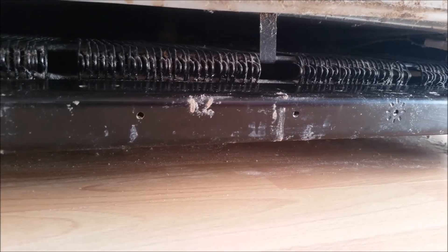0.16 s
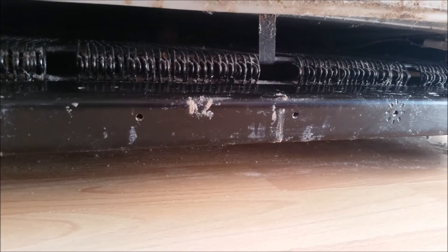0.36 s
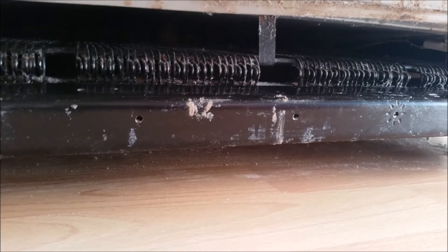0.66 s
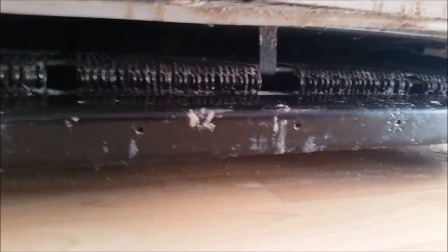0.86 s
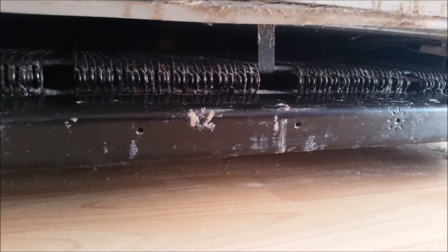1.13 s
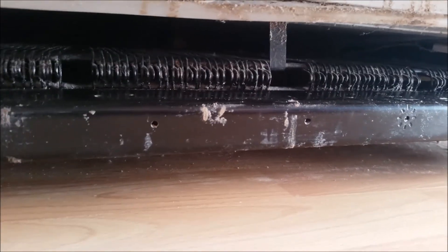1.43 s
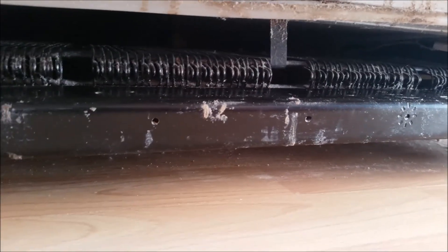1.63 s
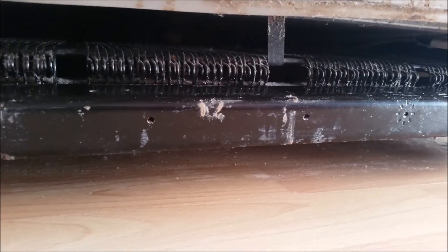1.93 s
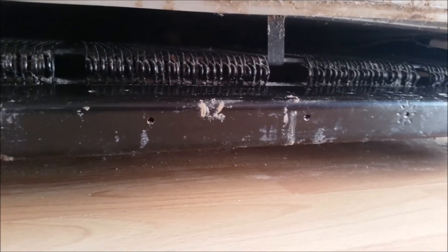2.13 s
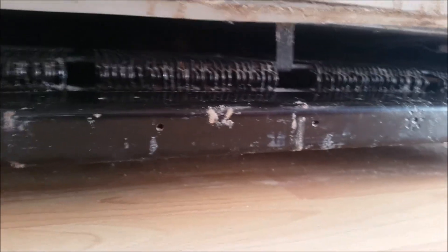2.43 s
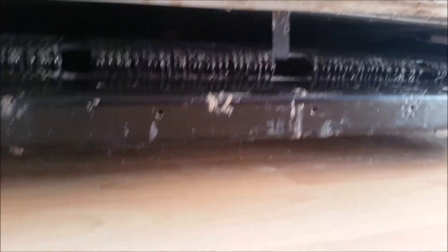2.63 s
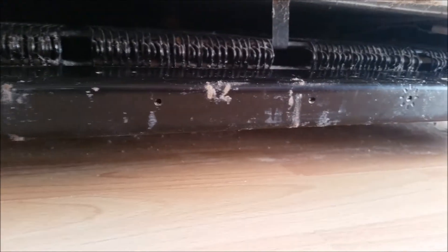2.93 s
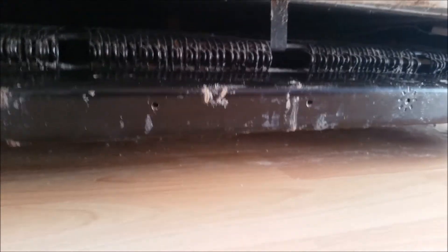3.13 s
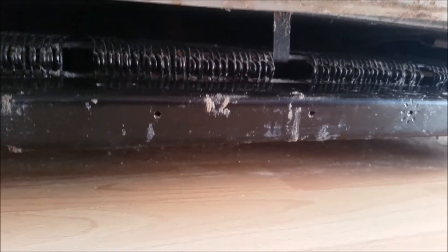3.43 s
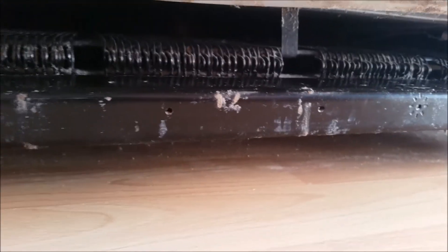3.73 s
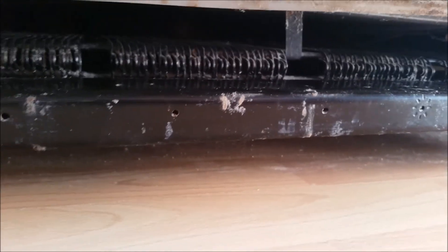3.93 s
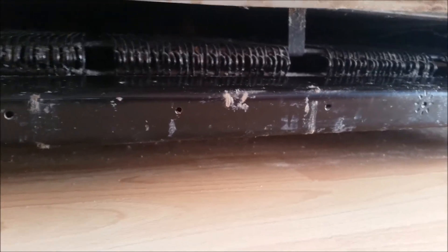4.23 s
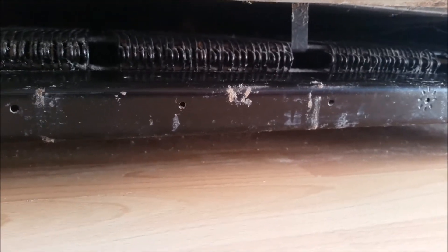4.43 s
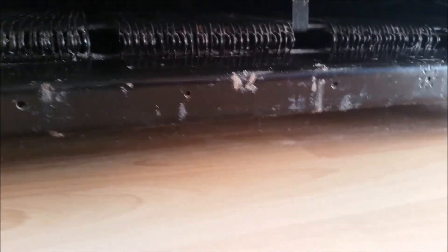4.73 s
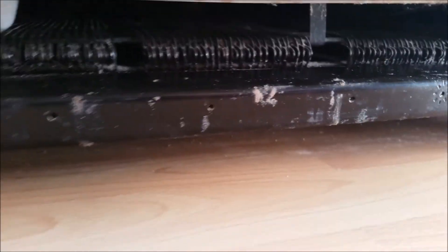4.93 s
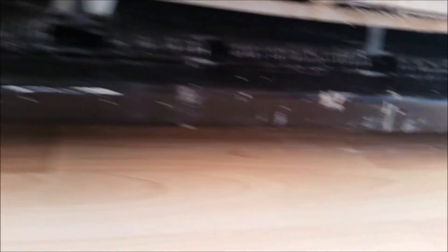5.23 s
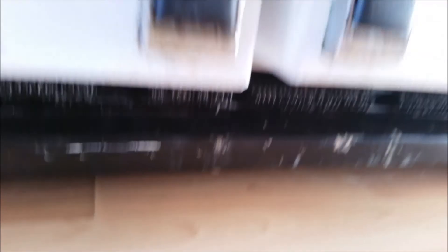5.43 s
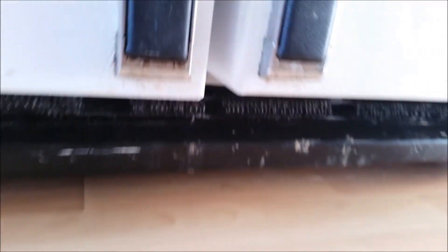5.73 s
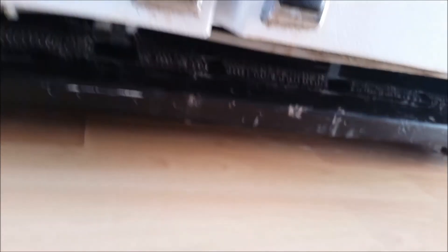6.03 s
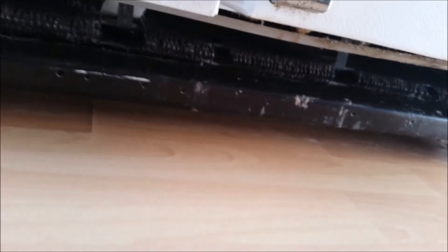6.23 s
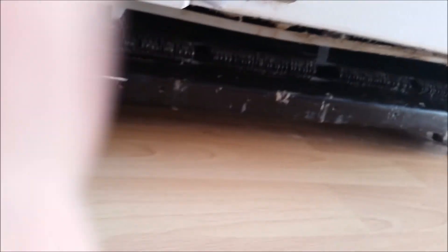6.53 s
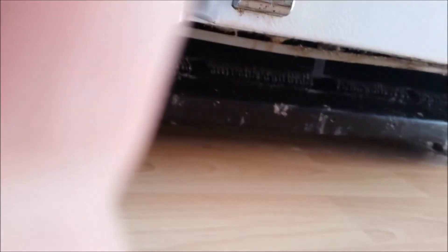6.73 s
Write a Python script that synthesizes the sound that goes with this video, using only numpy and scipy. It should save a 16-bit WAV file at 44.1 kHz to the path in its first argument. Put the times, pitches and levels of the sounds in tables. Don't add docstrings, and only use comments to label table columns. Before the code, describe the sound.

Deep throbbing fridge hum and soft airflow continue throughout, broken by sharp case snaps near one and two and a half seconds and late fumbling.

```python
import sys
import numpy as np
from scipy import signal
from scipy.fft import rfft, irfft
from scipy.io import wavfile
from scipy.ndimage import uniform_filter1d

SR = 44100
rng = np.random.default_rng(int(sys.argv[2]) if len(sys.argv) > 2 else 0)


def to_linear_factor(level_db):
    exponent = np.asarray(level_db, float) / 20
    return 10 ** exponent


def output_pcm(signal):
    pcm = np.clip(np.atleast_2d(signal).T, -1, 1) * 32767
    wavfile.write(sys.argv[1], SR, np.round(pcm).astype(np.int16))


N = 302967
T = np.arange(N) / SR

# order, left_db, right_db, left_lead_rad
COMPRESSOR_TONES = [(1, -44, -45.5, -.15), (2, -57.5, -59.5, .39), (4, -60, -52, 0.69),
                    (5, -50.5, -56, 0.76), (6, -56.5, -62.5, -0.64)]
FAN_TONES = [(1, -61, -56.5, .4), (2, -38, -38.5, 0.29), (4, -45.5, -47, 0.42), (5, -60, -59.5, 0.6),
             (6, -58, -66, 0.97)]
MAINS_TONES = [(2, -31, -31.5, 0.21), (4, -61.5, -58, .24)]
# pitch_hz, left_db, right_db, left_lead_rad
PANEL_TONES = [(93.62, -48.5, -48.5, .35), (146.3, -54, -56, .22), (289.7, -57, -59, .29)]
# freq_hz, level_db_per_hz
RUMBLE_SPECTRUM = [(25, -76.5), (45, -75.5), (80, -66), (135, -61.5), (160, -60.5), (185, -66.5),
                   (215, -62), (235, -63.5), (260, -71.5), (330, -73.5), (500, -82.5), (1500, -150)]
# freq_hz, level_db_per_hz
GRIP_SPECTRUM = [(20, -74.5), (45, -73), (80, -71), (150, -65), (300, -75.5), (500, -99), (1200, -150)]
# freq_hz, width_hz, level_db
CABINET_MODES = [(174.7, 17, -44), (187.2, 20, -47)]
# time_s, pitch_hz, level_db
BOOM_SWELLS = [(0.14, 175.9, -38), (0.3, 184.5, -31.0), (0.409, 184.8, -31.0), (0.53, 182.8, -39),
               (0.6, 180.8, -35.5), (0.74, 183.8, -31.5), (0.88, 180.6, -36), (1.05, 179.6, -34.5),
               (1.13, 186.2, -36.5), (1.19, 185.4, -35), (1.29, 187.4, -34), (1.41, 178.6, -33.5),
               (1.49, 184.0, -32.5), (1.56, 184.5, -33), (1.71, 184.0, -29.5), (1.8, 183.8, -35),
               (1.93, 181.4, -31.0), (2.07, 184.4, -36.0), (2.16, 186.0, -30.0), (2.27, 183.0, -34),
               (2.4, 182.2, -34.5), (2.59, 182.0, -33.5), (2.66, 183, -36.5), (2.75, 181, -28.5),
               (2.92, 181.1, -32.0), (3.03, 177.6, -37), (3.13, 188.0, -33), (3.201, 183.8, -30.0),
               (3.34, 184.3, -31), (3.4, 182.3, -29.5), (3.47, 188.7, -31), (3.55, 186.1, -29.5),
               (3.66, 180.0, -30.5), (3.78, 180.0, -30.5), (3.85, 183.7, -28.5), (3.94, 182.7, -31.5),
               (4.08, 184.0, -42.5), (4.14, 174, -41.5), (4.22, 174.2, -35), (4.29, 181.8, -33.5),
               (4.39, 183.9, -31.5), (4.451, 184.6, -31), (4.65, 186.0, -36), (4.73, 186.3, -36.5),
               (4.81, 180.1, -41), (4.9, 188.9, -34.5), (5.02, 184.5, -29), (5.1, 179.4, -36),
               (5.26, 187.4, -29), (5.33, 182.0, -31), (5.5, 182.1, -40), (5.6, 173.2, -31),
               (5.86, 185.2, -30.5), (5.95, 184.0, -28.5), (6.09, 184.0, -32.5), (6.211, 183.0, -37),
               (6.33, 181.0, -32), (6.47, 180.0, -35.5)]
# freq_hz, level_db_per_hz
AIR_LEFT_SPECTRUM = [(300, -78.5), (450, -72.5), (800, -77), (1150, -75.5), (1500, -89), (2050, -75.5),
                     (2400, -80.5), (2740, -100), (3000, -77), (3700, -77.5), (4250, -84), (5200, -107),
                     (6500, -121.1), (8500, -140.0)]
AIR_RIGHT_SPECTRUM = [(300, -86.5), (450, -78.5), (750, -76), (980, -86.5), (1350, -85), (1550, -86),
                      (1750, -99), (2200, -89.5), (2750, -100), (3400, -91.5), (4200, -93), (5000, -107.4),
                      (6500, -119.4), (8500, -140.0)]
# freq_hz, width_hz, level_db
CAVITY_MODE = (1310, 520, -54)
# freq_hz, level_db_per_hz
RUSTLE_TOP_SPECTRUM = [(7000, -135), (8800, -140), (10000, -121), (11500, -104), (13000, -101),
                       (14800, -102), (15700, -104), (16100, -160)]
RUSTLE_LOW_SPECTRUM = [(4200, -106), (5000, -111), (6200, -115), (7000, -126), (8000, -150)]
# time_s, rise_s, fall_s, level_db, left_minus_right_db
SLIDES = [(.02, .05, 0.15, -44.5, 4.5), (.89, .008, .012, -42, -11), (.97, .06, 0.13, -42, 7.5),
          (1.541, .002, .002, -40, -14), (2.1, 0.074, .02, -51, 4), (2.3, .2, .1, -54.5, 1.5),
          (2.72, 0.018, .03, -49, -5), (3.487, 0.0039, 0.017, -47, -9), (3.535, .003, .015, -55, -4),
          (3.622, 0.0034, .005, -45.5, -6), (3.66, 0.014, .016, -43.5, -9), (3.915, 0.01, 0.03, -34, -7),
          (4.02, .06, .05, -41, 6), (4.12, .05, .03, -39, 6), (4.647, .004, .006, -32, -10),
          (4.69, 0.035, 0.067, -27.5, -3), (4.745, .02, .012, -35, -13), (4.83, 0.037, .025, -36.5, 1),
          (5.04, 0.033, 0.031, -35, 0.5), (5.1, .02, .03, -37, 5), (5.44, 0.043, .04, -36, -2.5),
          (5.6, .015, .015, -41, -8), (5.82, 0.16, 0.29, -23, -1), (6.15, 0.037, .012, -26.5, 2)]
# time_s, rise_s, fall_s, level_db
CREEPS = [(.72, 0.075, 0.054, -19.5), (1, 0.062, 0.039, -12), (2.4, 0.06, 0.11, -10.5),
          (2.78, 0.2, 0.11, -13.5), (3.35, 0.072, 0.078, -13), (3.67, 0.031, 0.1, -6),
          (3.92, 0.13, 0.12, -8), (4.65, 0.021, 0.065, -14), (4.78, 0.12, 0.013, -7.5),
          (5.15, 0.045, 0.045, -16), (5.78, 0.047, .05, -23.5)]
# time_s, rise_s, fall_s, level_db
JOLTS = [(.86, 0.03, 0.039, -33), (3.54, 0.02, 0.034, -36), (3.65, 0.034, 0.034, -34.5),
         (4.67, 0.047, 0.044, -34), (4.83, 0.018, 0.033, -31), (4.95, 0.017, 0.037, -35.5),
         (5.03, 0.029, 0.029, -41), (5.155, 0.031, 0.018, -32.5), (6.3, 0.031, 0.028, -42),
         (6.66, 0.022, 0.026, -48), (6.8, 0.027, 0.035, -40)]
# time_s, peak_db, push_ms, sign
TAPS_LEFT = [(.982, -14, 0.28, -0.84), (.909, -24, 0.23, 0.51), (.938, -28, .2, -0.75),
             (.953, -31, 0.18, 0.47), (1.352, -18.5, 0.68, 0.97), (1.5301, -21.5, 0.52, -0.55),
             (1.94, -15.5, 1, 0.88), (2.322, -20.5, 0.13, 0.56), (2.394, -12.5, 0.94, -1.33),
             (2.3945, -23, 0.13, -1.05), (2.4458, -16.5, .3, -0.86), (2.66, -19.5, 0.097, 0.54),
             (2.748, -9.5, 0.84, 0.81), (3.608, -16, 0.16, -0.85), (3.655, -19, 0.14, -0.76),
             (3.783, -21.5, 0.19, -1.2), (3.799, -16.5, 0.58, -1.46), (3.811, -27, 0.29, 0.32),
             (3.916, -19, 0.6, 1), (4.016, -16, 0.74, 0.96), (4.3, -20.5, 0.68, 1),
             (4.6485, -16.5, 0.43, -0.77), (4.72, -23, 0.4, 1), (4.758, -22.5, 0.22, -0.87),
             (4.767, -26, 0.22, 0.41), (6.516, -14.5, 0.11, 1), (6.67, -0.5, 0.25, -0.5)]
TAPS_RIGHT = [(1.0303, -12, 0.89, -0.87), (1.035, -19, 3.4, -0.57), (1.5294, -27, .6, -1.2),
              (2.4595, -8.5, 0.71, 0.62), (2.4686, 7, 1.78, 0.64), (2.4718, -2.5, 5.2, -1.16),
              (2.5042, 10, 0.43, -0.23), (2.581, -20.5, 1, -1.4), (2.591, -15, 1.16, -1.26),
              (2.6595, -2.5, 0.4, 0.79), (3.54, -28.5, 1.5, 0.6), (3.64, -23, 1.3, 0.72),
              (4.674, -15, 1.5, 0.86), (4.743, -35, 1.1, 0.062), (4.83, -15.5, 0.72, 0.55),
              (4.945, -14, 1.4, 0.94), (5.151, -15.5, 1.1, 0.99), (6.644, -11, 1.3, 0.39),
              (6.6935, -6.5, 1.3, 0.73), (6.7817, -18, .25, -1.1), (6.7825, -24, 0.66, 0.7)]
BUMPS_LEFT = [(2.39, -12, 2.4, 0.84), (3.54, -26, 3.5, 0.85), (3.64, -20, 1, -1.2), (4.665, -21, 2, 1),
              (6.62, -16, 0.55, 1), (6.6255, -17, .6, 0.78), (6.6273, -15, 0.34, -1.1),
              (6.6298, -13, 0.28, 0.75), (6.632, -20, 0.54, -0.76), (6.6375, -14, .4, 1),
              (6.6418, -25, 0.34, -0.58), (6.6432, -19, 1.5, 0.86), (6.6488, -9, 0.28, 1),
              (6.6755, -13, 0.81, 0.84), (6.6785, -12, 0.71, 0.66), (6.6815, -4, 2.1, -0.97),
              (6.6845, 2, 0.66, 0.094), (6.695, -11, 1.2, -0.61), (6.7573, -3, 1.5, 0.85),
              (6.7595, -17, 1.3, -0.91), (6.782, -6, 1.04, -1.1), (6.798, -6.5, 2.2, -1.2),
              (6.813, -10, 1.2, -0.86), (6.834, -10, 1.7, 1), (6.845, -8.5, 0.92, -1.04),
              (6.868, -18, 0.9, 0.73)]
# freq_hz, width_hz, level_db
TAP_RING = (1200, 1600, 1.3)
# freq_hz, width_hz, level_db
SCUFF_MODE = (1300, 390, -41)
# time_s, peak_db, left_minus_right_db, brightness_db, top_band_db
SNAPS = [(1.0292, -13, 0.5, 1.5, -38), (1.529, -42, 3, 4, -18), (1.5405, -52, 3, 2, -27),
         (2.101, -51.5, 9, 8, -26), (2.4577, -12.5, 1, 1.5, -37.5), (2.5036, -19, 7.5, 5.5, -32),
         (2.5177, -40, -1, 7.5, -27), (3.6217, -54.5, -12, 0, -12.5), (3.7232, -52.5, -16.5, 0, -12),
         (3.7314, -47, -17, 0, -4.5), (3.915, -34, 2, 1, -20), (4.0157, -41.5, 2, 2, -22),
         (4.741, -36.5, 5, 0.5, -32), (5.58, -40, -15, 5, -18), (6.615, -43, 12, -1, -24),
         (6.6741, -27, -2, -6, -12), (6.6782, -18.5, 2.5, -8, -20.5), (6.6830, -26.5, -4, -7, -23),
         (6.6917, -20, 8, -13, -24.5), (6.692, -18.5, -5, -8, -12.5), (6.6921, -21, 6, -2, -20.5)]
# freq_hz, width_hz, level_db
PORT_LEFT_MODES = [(1750, 530, 11), (3680, 460, 8), (2200, 320, 4)]
PORT_RIGHT_MODE = (3700, 1200, -5.5)
# time_s, rise_s, fall_s, level_db, left_minus_right_db
RUB_STROKES = [(6.524, 0.0026, 0.0087, -28, 29), (6.54, 0.014, 0.019, -22.5, 37),
               (6.6, 0.069, 0.1, -46, 20), (6.635, 0.017, 0.015, -36, 29), (6.647, .008, .003, -39, 24),
               (6.681, 0.005, 0.0035, -32, 10), (6.6938, 0.001, 0.0015, -22.5, 6.5),
               (6.705, 0.0093, 0.036, -37.5, 10), (6.742, 0.014, 0.0063, -47.5, -1),
               (6.762, .014, .02, -46, 12), (6.785, 0.0074, 0.045, -42.5, 6), (6.82, .02, .02, -53, 8),
               (6.86, 0.02, 0.036, -41, 11.5)]
# time_s, rise_s, fall_s, level_db, left_minus_right_db
FLUTTERS = [
    (6.561, 0.037, 0.037, -26.5, 26),
    (6.636, .02, 0.012, -25.5, 30),
    (6.68, 0.012, 0.021, -27, 6),
    (6.765, 0.03, 0.067, -32.5, 12.5),
    (6.83, 0.024, 0.066, -29.5, 26),
]
# freq_hz, level_db_per_hz
RUB_SKIN_SPECTRUM = [(500, -11.5), (1300, 1.5), (2100, 2.5), (2700, -4), (3700, -8), (4300, -21.5),
                     (6000, -37)]
RUB_TOP_SPECTRUM = [(4500, -4.5), (6000, -9), (7400, -11.5), (8000, -29), (9300, -20), (10000, -11.5),
                    (13000, -6.5), (15000, -5.5), (15800, -4), (16100, -67.5)]
# freq_hz, t60_s, level_db
SHELL_MODE = (2000, 0.065, -19.5)
# time_s, hum_level_db
GAIN = [(0, -31.5), (.95, -31.5), (1.25, -32.5), (1.55, -36.5), (1.85, -36.5), (1.97, -34.5), (2.3, -31.5),
        (2.44, -32.5), (2.55, -35.5), (2.8, -39.5), (3.35, -40.5), (3.5, -36.5), (3.62, -32.5), (4.1, -31),
        (4.6, -31.5), (5.3, -32), (6.5, -31.5), (6.62, -31.5)]
# time_s, depth_db
DIPS = [
    (1.0294, 14.5),
    (2.457, 11),
    (2.5, 8.5),
    (6.6908, 1),
]
# freq_hz, level_db_per_hz
CAPSULE_SPECTRUM = [(4500, -133), (7000, -133), (10000, -133), (15700, -138), (16100, -170)]

COMPRESSOR_HZ, FAN_HZ, MAINS_HZ = 58.87, 52.67, 59.98
THROB_S = 0.032
HUM_DB = -31.5
EDGE_HZ = 3886
BOOM_RISE_S, BOOM_FALL_S = 0.05, 0.044
AIR_DB, AIR_SINK, RUSTLE_DB, RUSTLE_SINK = -16, 0.21, -47.5, 1
PULL_BACK_S, PULL_BACK_LEN_S = 5.6, 0.64
PULL_BACK_HUM_DB, PULL_BACK_AIR_DB = -2, 1.5
REGRIP_S, REGRIP_DB = 3.64, 5
UNCOVER_S, COVERED_DB, OPEN_DB = 4.81, -20, -27.5
SCUFF_S, SCUFF_HALF_S = 0.915, 0.028
PORT_LAG_S = 0.0004
THUMB_S = 6.5
TOP_DB, TOP_PER_PAN = -8, -0.5
WHISTLE_DB, WHISTLE_PER_PAN = -11, 0.35
SHELL_S = 6.6935


def white():
    return rng.standard_normal(N)


def noise(points):
    hz, db = np.transpose(points)
    f = np.fft.rfftfreq(N, 1 / SR) + 1e-3
    shape = np.interp(np.log(f), np.log(hz), db) - 40 * np.clip(np.log2(hz[0] / f), 0, 3)
    return irfft(rfft(white()) * to_linear_factor(shape), N) * np.sqrt(SR / 2)


def unit(x):
    return x / np.sqrt(np.mean(x ** 2))


def ring(x, hz, width_hz):
    return signal.lfilter(*signal.iirpeak(hz, hz / width_hz, fs=SR), x)


def steep(x, hz, width_hz):
    return ring(ring(x, hz, width_hz), hz, width_hz)


def butter(order, hz, kind="low"):
    return signal.butter(order, hz, kind, fs=SR, output="sos")


def low(x, hz, order):
    return signal.sosfilt(butter(order, hz), x)


def walk(rate_hz):
    hold = int(SR / rate_hz)
    levels = np.repeat(rng.standard_normal(N // hold + 1), hold)
    return unit(uniform_filter1d(uniform_filter1d(levels, hold), hold)[:N])


def swells(table, add_db=0, hop=20):
    s, rise_s, fall_s, db = np.array(table).T[:4, :, None]
    late_s = T[::hop] - s
    shape = np.where(late_s < 0, 2 * (late_s / rise_s) ** 2, 2 * abs(late_s / fall_s) ** 1.3)
    peak_power = to_linear_factor(2 * (db + np.reshape(add_db, (-1, 1))))
    return np.interp(T, T[::hop], np.sqrt((peak_power * np.exp(-shape)).sum(axis=0)))


def step(s, length_s):
    return 0.5 + 0.5 * np.tanh(2 * (T - s) / length_s)


def hum():
    out = np.zeros((2, N))
    motors = ((COMPRESSOR_HZ, COMPRESSOR_TONES), (FAN_HZ, FAN_TONES), (MAINS_HZ, MAINS_TONES), (1, PANEL_TONES))
    for base_hz, tones in motors:
        for order, left_db, right_db, lead_rad in tones:
            turn = rng.random() * (round(order) != 2)
            angle = 2 * np.pi * (round(order, 2) * base_hz * (T - THROB_S) + turn)
            level = np.sqrt(2) * to_linear_factor([[left_db], [right_db]])
            out += level * np.sin(angle + np.array([[lead_rad], [0]]))
    return out


def boom_swells():
    s, hz, db = np.transpose(BOOM_SWELLS)
    rows = np.c_[s, 0 * s + BOOM_RISE_S, 0 * s + BOOM_FALL_S, db]
    phase = 2 * np.pi * np.cumsum(np.interp(T, s, hz)) / SR
    return np.sqrt(2) * (swells(rows[::2]) - swells(rows[1::2])) * np.sin(phase)


def rumble():
    boom = sum(to_linear_factor(db + 0.45 * walk(7.7)) * unit(steep(white(), hz, width_hz))
               for hz, width_hz, db in CABINET_MODES)
    grip_left = noise(GRIP_SPECTRUM) * to_linear_factor(-4.5 + 3.1 * walk(1.6))
    grip_right = noise(GRIP_SPECTRUM) * to_linear_factor(walk(3.1))
    return boom + boom_swells() + noise(RUMBLE_SPECTRUM) + np.array([grip_left, grip_right])


def air(cavity_db):
    hz, width_hz, db = CAVITY_MODE
    cavity = to_linear_factor(db + 1.1 * (cavity_db + 24.5)) * unit(steep(white(), hz, width_hz))
    ports = np.array([noise(AIR_LEFT_SPECTRUM), noise(AIR_RIGHT_SPECTRUM) + cavity])
    return to_linear_factor(1.7 * walk(12)) * low(ports, EDGE_HZ, order=6)


def rustle(level_db, patchy_db=2.0):
    top = np.array([noise(RUSTLE_TOP_SPECTRUM), noise(RUSTLE_TOP_SPECTRUM)])
    top = to_linear_factor(level_db + 39.5 + 1.1 * walk(30)) * top
    patches = []
    for _ in range(2):
        hiss = noise(RUSTLE_LOW_SPECTRUM)
        patches.append(sum(to_linear_factor(patchy_db * walk(25)) * steep(hiss, hz, 750) for hz in range(4500, 7600, 500)))
    return top + to_linear_factor(0.75 * (level_db + 39.0) + 6.5) * np.array(patches)


def creep(per_s=700, scatter_db=2.0):
    size = to_linear_factor(scatter_db * white()) * rng.choice([-1, 1], N)
    ticks = (rng.random(N) < per_s / SR) * size
    dull = unit(low(steep(ticks, 460, 470), 1400, order=3))
    return swells(CREEPS) * dull * np.array([[1], [0.2]])


def jolts():
    shared, *own = (unit(steep(white(), 74, 70)) for _ in range(3))
    return swells(JOLTS) * (shared + 0.6 * np.array(own))


def taps(table, vent_hz):
    push = np.zeros(N)
    for s, db, ms, sign in table:
        near = slice(max(int((s - 0.1) * SR), 0), int((s + 0.1) * SR))
        push[near] += sign * to_linear_factor(db + 2.0) / (1 + ((T[near] - s) * 1300 / ms) ** 2)
    return signal.sosfilt(butter(2, vent_hz, "high"), low(push, EDGE_HZ, order=3))


def fingers():
    tap = taps(TAPS_LEFT, vent_hz=288)
    hz, width_hz, db = TAP_RING
    left = 0.5 * tap + to_linear_factor(db) * ring(tap, hz, width_hz) + taps(BUMPS_LEFT, vent_hz=84.5)
    right = taps(TAPS_RIGHT, vent_hz=65.0)
    return np.array([left + 0.013 * right, right + 0.039 * left])


def scuff(grit_db=1.5):
    hz, width_hz, db = SCUFF_MODE
    grit = white() * to_linear_factor(grit_db * walk(310))
    squeak = unit(steep(grit, hz, width_hz)) + to_linear_factor(-3.5) * unit(steep(grit, 1600, 1600))
    swell = np.exp(-0.5 * ((T - SCUFF_S) / SCUFF_HALF_S) ** 2)
    return low(squeak, EDGE_HZ, order=6) * to_linear_factor(db) * swell * np.array([[1], [0.22]])


def snaps(lag_s=0.0014, rattle_s=0.001):
    t = np.arange(-100, 700) / SR
    edges = butter(9, 4000), butter(4, 4700)
    glint_band = butter(4, [4300, 5600], "band")
    vent = butter(2, 750, "high")
    top_bands = [butter(6, band, "band") for band in ([10300, 15500], [11000, 16000])]
    right_hz, right_width_hz, right_db = PORT_RIGHT_MODE
    out = np.zeros((2, N))
    for s, db, pan_db, bright_db, top_db in SNAPS:
        rattle = rng.standard_normal(len(t)) * np.exp(-abs(t) / rattle_s) * (t >= 0)
        burst = 0.04 * rattle - (t == 0)
        glint = signal.sosfilt(glint_band, burst)
        left = signal.sosfilt(vent, burst)
        for k, (hz, width_hz, mode_db) in enumerate(PORT_LEFT_MODES):
            left = left + to_linear_factor(mode_db + bright_db * (k == 1)) * ring(burst, hz, width_hz)
        right = burst + to_linear_factor(right_db + bright_db) * ring(burst, right_hz, right_width_hz)
        right = right * (1 if s < THUMB_S else -1)
        for side, click, start_s in ((0, left, s + lag_s), (1, right, s + lag_s - PORT_LAG_S)):
            click = signal.sosfiltfilt(edges[side], click)
            click = click / abs(click).max() + to_linear_factor(3.7 * bright_db - 24.2 + 3.7 * side) * glint
            top = signal.sosfilt(top_bands[side], burst + rattle / 8)
            top = top + 2.5 * side * ring(top, 14600, 1500)
            click_db = db + 7.5 + pan_db * (0.5 - side)
            top_peak_db = db + top_db + 7.5 + 2.9 * side + 0.6 * pan_db * (1 - side)
            i = int((start_s + t[0]) * SR)
            out[side, i:i + len(t)] += click / abs(click).max() * to_linear_factor(click_db)
            out[side, i:i + len(t)] += top / abs(top).max() * to_linear_factor(top_peak_db)
    return out


def rub(grit_db=-0.5):
    pan_db, weight_pan_db = np.array(RUB_STROKES)[:, 4], np.array(FLUTTERS)[:, 4]
    out = []
    for side, whistle_gain in ((0.85, 0.81), (-0.97, 0.52)):
        port_db = 7.0 + np.minimum(side * pan_db, 0)
        skin = swells(RUB_STROKES, port_db - 3.5) * unit(noise(RUB_SKIN_SPECTRUM))
        whistle_db = port_db - 1.5 + WHISTLE_DB + WHISTLE_PER_PAN * pan_db
        whistle = swells(RUB_STROKES, whistle_db) * unit(steep(white(), 3110, 630))
        skin = skin + whistle_gain * whistle
        grit = to_linear_factor(grit_db * walk(370))
        dull = unit(steep(white(), 367, 810)) + to_linear_factor(1.0) * unit(steep(white(), 130, 240))
        dull = dull * to_linear_factor(1.73 * walk(90)) * swells(FLUTTERS, 4.0 + np.minimum(side * weight_pan_db, 0))
        top_db = TOP_DB + TOP_PER_PAN * pan_db + 4.5 + side * (0.42 * pan_db - 9.0)
        hiss = unit(noise(RUB_TOP_SPECTRUM))
        hiss = hiss - 0.76 * (side < 0) * ring(hiss, 10800, 4500)
        out.append(low(skin * grit + dull, EDGE_HZ, order=8) + hiss * swells(RUB_STROKES, top_db))
    return np.array(out)


def shell():
    hz, t60_s, db = SHELL_MODE
    late_s = np.clip(T - SHELL_S, 0, 1)
    decay = to_linear_factor(db - 60 * late_s / t60_s + 2.0 * walk(250))
    upper = 0.51 * to_linear_factor(3.0 * walk(300)) * np.sin(2 * np.pi * 3300 * late_s)
    return decay * (np.sin(2 * np.pi * hz * late_s) + upper) * np.array([[1], [0.3]])


def scene():
    back = step(PULL_BACK_S, PULL_BACK_LEN_S)
    gain_db = np.interp(T, *np.transpose(GAIN)) - HUM_DB
    air_db = AIR_DB + AIR_SINK * gain_db + PULL_BACK_AIR_DB * back
    pan_db = np.array(SLIDES)[:, 4]
    slide = np.array([swells(SLIDES, pan_db / 2), swells(SLIDES, -pan_db / 2)])
    cavity_db = COVERED_DB + (OPEN_DB - COVERED_DB) * step(UNCOVER_S, 0.05)
    cavity_db = cavity_db + 0.91 * walk(10.0) + 45 * slide[1]
    hiss = to_linear_factor(RUSTLE_DB + RUSTLE_SINK * gain_db + REGRIP_DB * step(REGRIP_S, 0.05))
    rustle_db = 10 * np.log10(hiss ** 2 + slide ** 2)
    dip_db = sum(-db * np.exp(-0.5 * ((T - s + 0.013) / 0.0072) ** 2) for s, db in DIPS)
    fan_air = to_linear_factor(air_db + 15.0 + 24 * slide) * air(cavity_db - air_db - 20.5)
    fridge = hum() + fan_air + to_linear_factor(0.5 * (air_db + 18)) * rumble()
    gained = fridge + rustle(rustle_db) + to_linear_factor(HUM_DB) * creep()
    handling = jolts() + fingers() + scuff() + snaps() + rub() + shell()
    return to_linear_factor(gain_db + PULL_BACK_HUM_DB * back + dip_db) * gained + handling


def top_cut(x):
    return signal.sosfilt(signal.butter(12, 16500, fs=SR, output="sos"), x)


def record(dry):
    mix = dry + np.array([noise(CAPSULE_SPECTRUM), noise(CAPSULE_SPECTRUM)])
    return top_cut(mix)


dry = scene()
out = record(dry)
output_pcm(out)
```